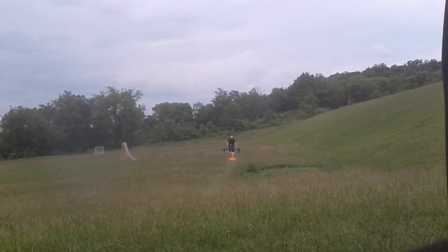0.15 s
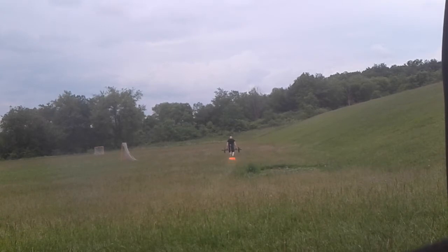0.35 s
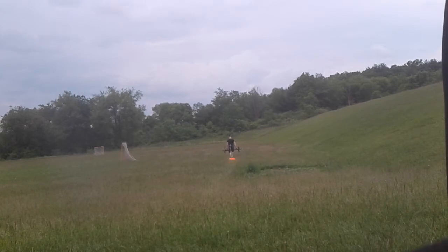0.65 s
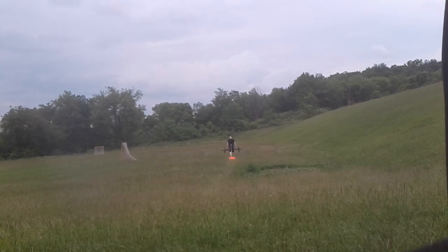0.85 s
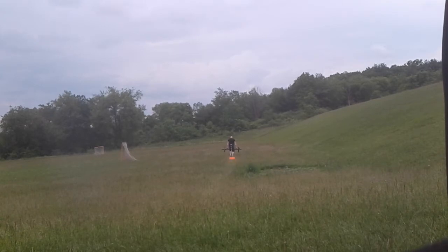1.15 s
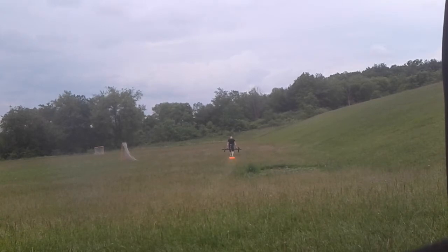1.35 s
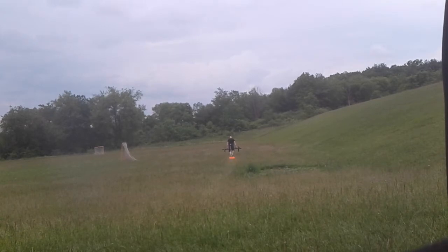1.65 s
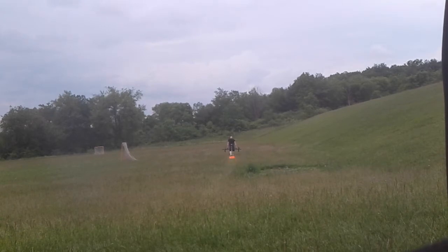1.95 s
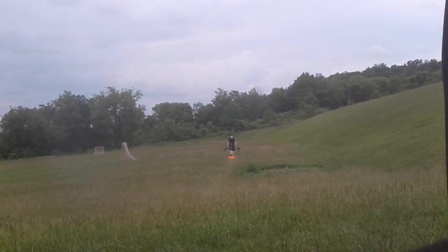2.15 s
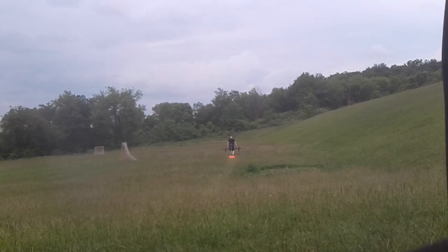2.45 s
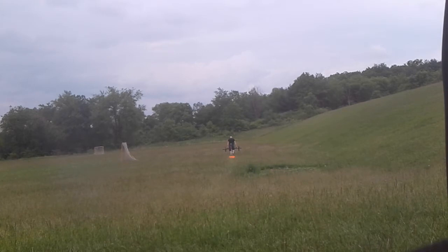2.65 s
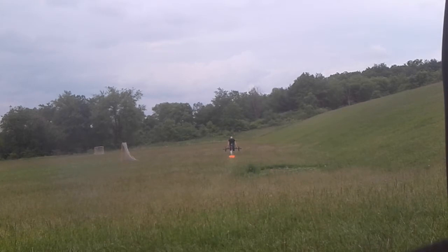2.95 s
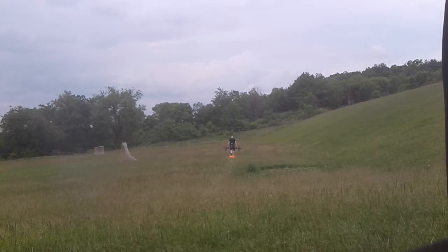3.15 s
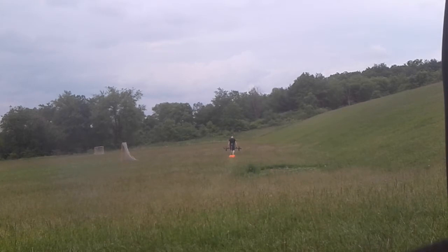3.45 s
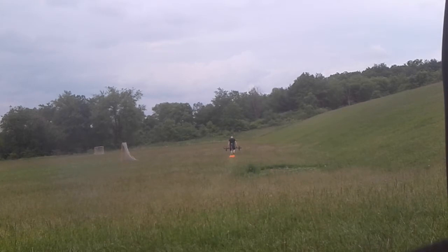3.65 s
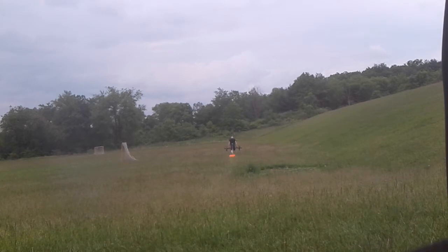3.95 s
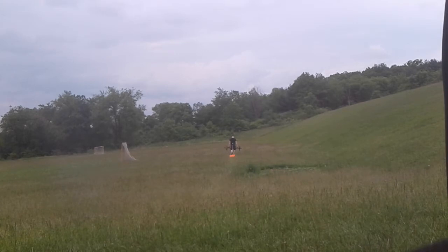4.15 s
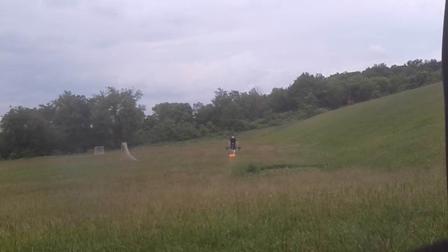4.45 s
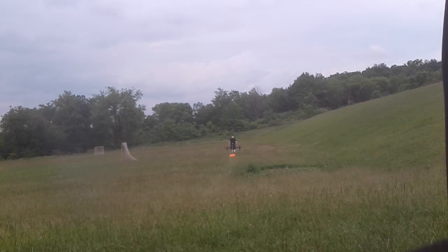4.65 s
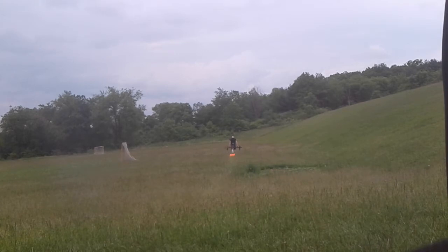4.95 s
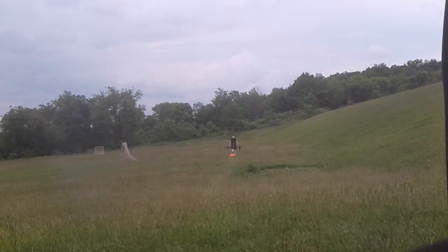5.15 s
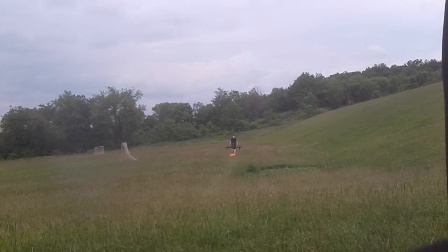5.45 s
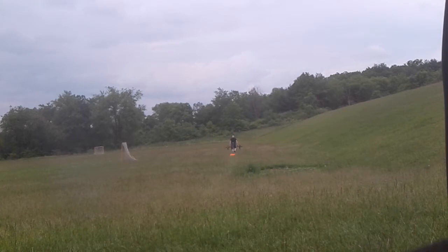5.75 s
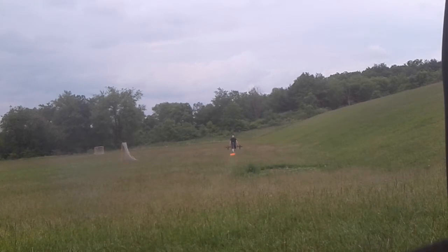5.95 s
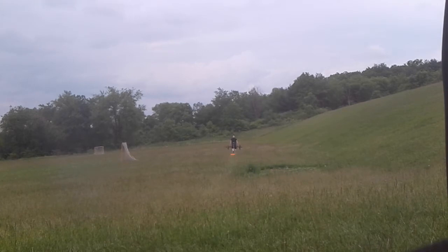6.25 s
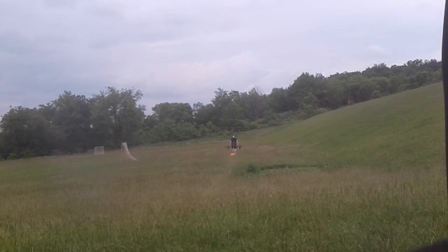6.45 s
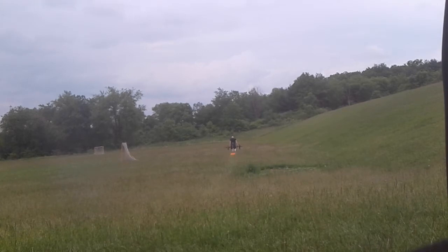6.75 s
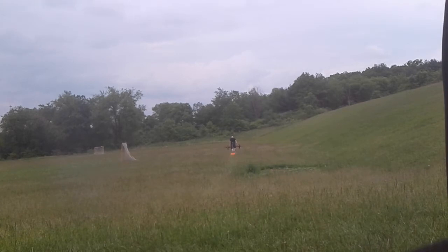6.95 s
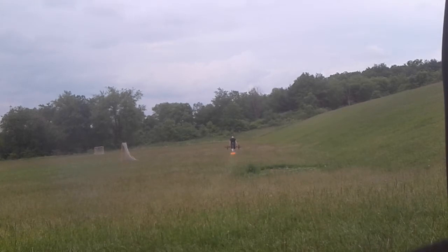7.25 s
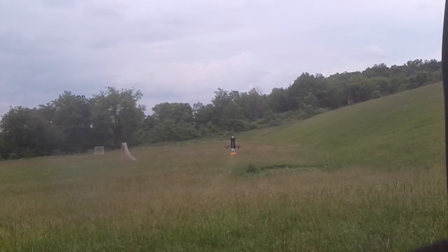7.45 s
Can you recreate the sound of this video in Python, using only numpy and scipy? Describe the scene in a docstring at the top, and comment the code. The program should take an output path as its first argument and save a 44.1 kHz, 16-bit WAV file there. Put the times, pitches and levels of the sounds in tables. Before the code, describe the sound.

Low wind gusts rumble and thump softly on the microphone in an open meadow while small birds chirp over faint distant traffic.

```python
"""A light wind in an open meadow, with birds along the tree line and traffic far off.
At first gusts rumble and knock on the two microphone ports while a bird warbles; clear peeps soon start
and quicken, then a thin trill joins high above. As the wind eases, with a few later knocks, whistles and
warbles carry on as gliding sines with a diffuse echo, and a few engine notes rise out of the drone.
Throughout lie the filtered noise of far traffic, its steady rush and low drone, and a thin hiss."""
import sys
import numpy as np
from scipy import signal
from scipy.fft import rfft, irfft
from scipy.io import wavfile

SR = 44100
rng = np.random.default_rng(int(sys.argv[2]) if len(sys.argv) > 2 else 0)


def to_wav(sig):
    """Store sig (one row per channel, or 1-D mono) as 16-bit WAV at the path in sys.argv[1].

    Samples outside -1..1 are clipped; the rate is SR.
    """
    pcm = np.clip(np.atleast_2d(sig), -1, 1) * 32767
    pcm = np.round(pcm).astype(np.int16)
    wavfile.write(sys.argv[1], SR, pcm.T)  # frames by channels


N = 335160
T = np.arange(N) / SR
FREQS = np.maximum(np.arange(N // 2 + 1) * SR / N, 1)
LEFT_RIGHT = np.array([[1], [-1]])  # sign of the left and the right port


def undb(db):
    """Decibels to gain."""
    return 10 ** (np.asarray(db) / 20)


def noise(gain):
    """Noise of rms 1 with the given gain at each frequency."""
    x = irfft(rfft(rng.standard_normal(N)) * gain, N)
    return x / np.std(x)


def colour(points):
    """Gain at each frequency from (pitch_hz, density_db) points; it falls away beyond the ends."""
    hz, db = np.transpose(points)
    gain = undb(np.interp(np.log(FREQS), np.log(hz), db))
    low_slope = np.minimum(FREQS / hz[0], 1) ** 2
    high_slope = np.minimum(hz[-1] / FREQS, 1) ** 2
    return gain * low_slope * high_slope


def walk(rate_hz):
    """Slow chance of spread 1 that changes about rate_hz times a second."""
    return noise(np.exp(-(FREQS / max(rate_hz, 1)) ** 2))


# rumble colour, relative: pitch_hz [Hz], density_db [dB per Hz]
RUMBLE_COLOUR = [(20, -38), (35, -18), (55, -5.5), (85, 2.5), (130, -3.5), (200, -11), (330, -20.5),
                 (600, -36.5), (1500, -77)]
# breeze between gusts, before the breeze trim: time_s [s], level_db [dB]
BREEZE_LEVEL = [(0.0, -45), (0.17, -50), (0.36, -50), (0.51, -47.5), (0.97, -50.5), (3.22, -53),
                (3.85, -47.5), (4.38, -56.5), (5.31, -58.5), (7.6, -54)]
# gusts that brush the ports, before shaping: peak_s [s], reach_s [s from peak to 1/e squared],
# level_db [dB at the windward port], pan_db [dB, left minus right]
GUST_SWELLS = [(.01, .06, -41, 5), (0.133, 0.049, -37, -9), (0.397, 0.12, -35.5, 10),
               (0.554, 0.18, -34, -14), (0.685, 0.13, -36, -20), (0.997, 0.046, -42, 3),
               (1.225, 0.041, -39, 2), (1.29, .09, -41.5, -13), (1.584, 0.061, -46, 7),
               (1.717, 0.042, -40, 10), (1.902, 0.29, -47.5, -10), (2.05, 0.036, -45, -4),
               (2.594, 0.044, -44.5, -3), (2.727, 0.048, -43, 9), (2.81, 0.033, -44, -8),
               (3.12, .05, -41.5, 16), (3.48, 0.41, -44.5, 10), (3.653, 0.091, -42, 8),
               (3.903, 0.15, -43.5, -14), (4.12, 0.042, -43, 9), (4.43, 0.046, -52, 0),
               (6.386, 0.068, -47, 1), (6.52, .04, -45, -8), (6.758, 0.18, -49, 2), (6.92, 0.058, -45, -2),
               (7.554, 0.057, -46, 6)]


def wind(calm_db=-53, ceiling_db=-37, breeze_trim_db=1.0, rumble_trim_db=-0.05,
         flutter_db=0.73, flutter_rate_hz=14):
    """Turbulence at each port: separate low rumbles follow a breeze and gusts that swell and die."""
    power = undb(breeze_trim_db + np.interp(T, *np.transpose(BREEZE_LEVEL))) ** 2
    for peak_s, reach_s, level_db, pan_db in GUST_SWELLS:
        swell = np.exp(-2 * ((T - peak_s) / reach_s) ** 2)
        port_gain = undb(level_db + np.minimum(LEFT_RIGHT * pan_db, 0))
        power = power + (swell * port_gain) ** 2
    # well below calm_db the rumble drops twice as fast in dB
    pressure = power / np.sqrt(power + undb(calm_db) ** 2)
    # the strongest gusts level off towards the ceiling
    pressure = pressure / np.hypot(1, pressure / undb(ceiling_db))
    ports = [noise(colour(RUMBLE_COLOUR)) * undb(flutter_db * walk(flutter_rate_hz)) for _ in range(2)]
    return np.array(ports) * pressure * undb(rumble_trim_db)


# strong eddies that knock on a port: centre_s [s], half_length_ms [ms],
# level_db [dB before the knock trim], side [0 left to 1 right]
EDDY_KNOCKS = [(0.0122, 1.25, -29, 0.18), (.3871, 1.5, -15.5, 0.024), (0.4127, 2.6, -24, 0),
               (0.426, 1.32, -20, 0), (.437, 1.2, -29, 1), (0.454, 1.5, -29, 0.015), (0.5451, 2, -27, 0.82),
               (0.5554, 2.5, -25, 0.97), (0.734, 2.5, -24.5, 1), (0.9933, 2.7, -34, 0.15),
               (1.224, 1.75, -19, 0.23), (1.299, 2.4, -34, 0.88), (3.111, 1.74, -25, 0),
               (3.367, 1.3, -33, 0.054), (3.629, 1.4, -30, 0.41), (3.857, 1.3, -28.5, 0.89),
               (3.8816, 2.8, -31, 0.82), (6.93, 1.8, -28.5, .7)]


def knocks(skirt=0.34, trim_db=-3.6):
    """An eddy crossing a port sucks, then pushes: one soft cycle of pressure with a slower skirt."""
    out = np.zeros((2, N))
    for centre_s, half_length_ms, level_db, side in EDDY_KNOCKS:
        u = (T - centre_s) * 1000 / half_length_ms
        near = np.abs(u) < 10
        u = u[near]
        cycle = u * np.exp((1 - u ** 2) / 2)
        slow_cycle = u / 2 * np.exp((1 - (u / 2) ** 2) / 2)
        angle = np.clip(side, 0, 1) * np.pi / 2
        port_gains = [np.cos(angle), np.sin(angle)]
        out[:, near] += undb(level_db + trim_db) * np.outer(port_gains, cycle - skirt * slow_cycle)
    return out


def birds(song_trim_db=-0.77, quaver=0.0045, shimmer_db=2, port_lag_s=.00004):
    """Each note is a pure whistle that glides, bends and quavers; the left port leads by port_lag_s."""
    out = np.zeros((2, N))
    pitch_wobble = 1 + quaver * walk(110)
    shimmer = undb(shimmer_db * walk(70))
    notes = warble() + whistlers() + peeps() + trill() + far_birds()
    for start_s, length_s, middle_hz, glide_hz, arch_hz, level_db, pan_db in notes:
        span = slice(max(int(start_s * SR), 0), min(int((start_s + length_s) * SR), N))
        u = np.linspace(0, 1, span.stop - span.start)
        # a positive arch lowers both ends, a negative one raises them
        hz = middle_hz + glide_hz * (u - .5) - arch_hz * (2 * u - 1) ** 2
        hz = hz * pitch_wobble[span]
        phase = 2 * np.pi * (np.cumsum(hz) / SR + LEFT_RIGHT * hz * port_lag_s / 2)
        swell = np.abs(np.sin(np.pi * u)) ** 0.44 * shimmer[span]
        out[:, span] += np.sin(phase) * swell * undb(song_trim_db + level_db + LEFT_RIGHT * pan_db / 2)
    return out


# Every bird function returns notes as: start_s, length_s, middle_hz, glide_hz, arch_hz,
# level_db (before song trim and shimmer), pan_db (left minus right).

# quick flicks: start_s [s], length_s [s], glide_hz [Hz], level_db [dB before song trim]
WARBLE_FLICKS = [(.775, 0.028, 300, -59), (1.406, .035, 600, -63), (1.444, 0.03, -600, -60.5),
                 (1.584, 0.019, -300, -60), (1.922, .028, -400, -63), (2.529, .016, 250, -64),
                 (2.544, .015, -300, -57.5), (2.584, 0.017, -400, -57.5), (2.593, .014, 400, -60),
                 (2.671, 0.0081, -400, -55), (3.204, 0.0087, -500, -59), (3.859, .023, 420, -62),
                 (3.887, .018, -400, -63), (3.942, 0.024, -500, -59.5), (4.085, 0.0195, -520, -58),
                 (4.521, .012, -400, -58.5), (5.052, .016, 250, -58), (5.636, 0.017, -480, -56.5),
                 (5.655, .014, -410, -57), (5.754, .014, -450, -57), (6.252, 0.018, 350, -57),
                 (6.29, .014, -350, -64), (7.156, .012, -300, -62.5)]
# longer slurs: start_s [s], length_s [s], middle_hz [Hz], level_db [dB before song trim]
WARBLE_SLURS = [(0.149, 0.05, 2560, -65), (0.799, 0.027, 2630, -57), (1.216, 0.0516, 2616, -54.5),
                (2.109, .051, 2530, -62.5), (2.475, 0.037, 2630, -62.5), (2.682, 0.025, 2620, -56),
                (2.766, 0.033, 2650, -56.5), (2.798, 0.043, 2560, -63), (3.147, 0.05, 2626, -52.5),
                (4.14, .055, 2544, -52.5), (5.055, .036, 2530, -52.5), (5.194, 0.058, 2520, -67),
                (5.77, .033, 2590, -64), (6.263, .028, 2580, -58), (6.716, 0.056, 2570, -54.5)]


def warble(flick_hz=2600, flick_arch_hz=25, slur_glide_hz=-230, slur_arch_hz=-35, pan_db=-2.5):
    """A bird mixes quick flicks, all through one pitch, with longer slurs that fall and level out."""
    flicks = [(start_s, length_s, flick_hz, glide_hz, flick_arch_hz, level_db, pan_db)
              for start_s, length_s, glide_hz, level_db in WARBLE_FLICKS]
    slurs = [(start_s, length_s, middle_hz, slur_glide_hz, slur_arch_hz, level_db, pan_db)
             for start_s, length_s, middle_hz, level_db in WARBLE_SLURS]
    return flicks + slurs


# long held notes: start_s [s], length_s [s], middle_hz [Hz], level_db [dB before song trim]
HELD_NOTES = [(.1, .06, 2835, -71), (.231, 0.089, 2790, -64.5), (2.07, 0.063, 2820, -67),
              (2.193, 0.077, 2780, -59.5), (3.24, .052, 2775, -70), (4.997, 0.066, 2850, -70),
              (5.115, 0.13, 2816, -71.5), (5.701, .067, 2750, -69)]
# soft whistles: start_s [s], length_s [s], middle_hz [Hz], glide_hz [Hz], level_db [dB before song trim]
GLIDING_WHISTLES = [(.374, .069, 2420, -110, -66), (1.657, 0.058, 2280, 120, -66),
                    (2.055, .035, 2170, 320, -63), (2.08, 0.037, 2200, -320, -56),
                    (2.283, .12, 2397, -100, -67), (2.415, .035, 3580, 250, -69),
                    (2.522, 0.041, 1208, -40, -57), (2.735, .035, 4060, -400, -74),
                    (2.845, 0.094, 2180, -360, -65), (3.28, 0.053, 2340, 20, -63),
                    (3.325, 0.035, 2220, -230, -62), (3.538, 0.039, 1203, -20, -51),
                    (4.595, 0.05, 2280, 200, -59), (4.677, .04, 2080, -100, -61.5),
                    (5.248, .089, 2385, -100, -64), (5.57, .018, 3560, -100, -63),
                    (5.586, .018, 3480, -500, -65), (6.309, 0.071, 2320, -180, -65),
                    (7.211, .083, 2270, 80, -69)]
WHISTLE_ARCH_HZ = 25


def whistlers(held_glide_hz=-54, held_pan_db=-12.5):
    """One bird holds notes that barely sag, panned by held_pan_db; others glide at equal level in both ports."""
    held = [(start_s, length_s, middle_hz, held_glide_hz, 0, level_db, held_pan_db)
            for start_s, length_s, middle_hz, level_db in HELD_NOTES]
    whistles = [(start_s, length_s, middle_hz, glide_hz, WHISTLE_ARCH_HZ, level_db, 0)
                for start_s, length_s, middle_hz, glide_hz, level_db in GLIDING_WHISTLES]
    return held + whistles


def peeps(count=9, start_s=.665, slow_gap_s=.326, fast_gap_s=.15, quicken_note=2.85, quicken_notes=.35,
          first_hz=4185, last_hz=3816, settle_notes=2.5, arch_hz=-20,
          base_db=-65, loudest_note=3.4, fade_db=.22, shy_db=-7.5, shy_notes=2.1,
          min_length_s=0.023, gap_share=0.18):
    """Clear peeps speed up and shorten as their pitch sinks and settles; the song swells and fades."""
    k = np.arange(count)
    quickness = 1 + np.exp((k - quicken_note) / quicken_notes)
    gaps_s = fast_gap_s + (slow_gap_s - fast_gap_s) / quickness
    starts_s = start_s + np.cumsum(gaps_s) - gaps_s
    pitches_hz = last_hz + (first_hz - last_hz) * np.exp(-k / settle_notes)
    levels_db = base_db - fade_db * (k - loudest_note) ** 2
    levels_db = levels_db + shy_db / (1 + (k / shy_notes) ** 6)  # a softer opening
    return [(s, min_length_s + gap_share * gap_s, hz, 0, arch_hz, db, 0)
            for s, gap_s, hz, db in zip(starts_s, gaps_s, pitches_hz, levels_db)]


def trill(count=5, start_s=1.785, gap_s=.151, length_s=.045, first_hz=6015, sag_hz_per_s=160,
          level_db=-79.5, pan_db=-2):
    """Evenly spaced thin, high notes, each a little lower than the last."""
    return [(start_s + t, length_s, first_hz - sag_hz_per_s * t, 0, 0, level_db, pan_db)
            for t in gap_s * np.arange(count)]


def far_birds(count=22, centre_hz=2600, spread_octaves=.22, glide_hz=300, length_s=.045,
              level_db=-72, spread_db=2, pan_db=4):
    """Birds deeper in the wood chirp faintly, with random times, lengths, pitches, glides and places."""
    starts_s = rng.uniform(0, T[-1] - .2, count)
    chance = rng.standard_normal((count, 5))
    return [(start_s, length_s * 2 ** (a / 2), centre_hz * 2 ** (spread_octaves * b), glide_hz * c,
             WHISTLE_ARCH_HZ, level_db + spread_db * d, pan_db * e)
            for start_s, (a, b, c, d, e) in zip(starts_s, chance)]


def tree_line(song, echo_db=-6, t60_s=0.31, build_s=0.0054):
    """Trunks and leaves scatter the song into a short diffuse tail that blurs the notes together."""
    t = T[:SR]
    decay = undb(-60 * t / t60_s)
    scatter = rng.standard_normal((2, SR)) * decay * (1 - np.exp(-t / build_s))
    scatter /= np.sqrt(np.sum(scatter ** 2, axis=1, keepdims=True))
    tail = signal.fftconvolve(song.mean(axis=0)[None], scatter, axes=1)[:, :N]
    return song + undb(echo_db) * tail


# single far engines: start_s [s], end_s [s], start_hz [Hz], end_hz [Hz], level_db [peak dB before waver]
ENGINE_NOTES = [(2.049, 3.001, 176.5, 196.8, -54), (4.884, 6.49, 235, 235.9, -60.5),
                (5.39, 8.2, 76.83, 75.06, -55.5), (7.05, 7.8, 404.6, 399, -67)]


def engines(drift=0.00371, waver_db=1.0):
    """The firing note of a distant vehicle swells, wavers in the moving air and fades."""
    out = np.zeros(N)
    for start_s, end_s, start_hz, end_hz, level_db in ENGINE_NOTES:
        u = np.clip((T - start_s) / (end_s - start_s), 0, 1)
        hz = start_hz + (end_hz - start_hz) * np.sin(np.pi / 2 * u)
        hz = hz * (1 + drift * walk(3.33))
        swell = np.sqrt(np.abs(np.sin(np.pi * u))) * undb(level_db + waver_db * walk(7.1))
        out += swell * np.sin(2 * np.pi * np.cumsum(hz) / SR)
    return out


# rush colour common to both ports, relative: pitch_hz [Hz], density_db [dB per Hz]
RUSH_MID_COLOUR = [(30, -3.5), (60, 4.5), (130, 7.5), (260, 3.5), (350, -4.5), (750, -4), (1090, -3),
                   (1240, -11.5), (1900, -15.5), (2650, -18.5), (3050, -23), (5000, -32.5), (9000, -45)]
# rush colour differing between the ports, relative: pitch_hz [Hz], density_db [dB per Hz]
RUSH_SIDE_COLOUR = [(30, -10), (70, -11), (300, 1.5), (500, -0.5), (740, 0), (860, 4), (1200, 1.5),
                    (1800, 1.5), (1970, 3), (2160, -10.5), (2350, -5), (3100, -13), (5000, -21.5),
                    (9000, -44)]
# level of the rush, before mid and side trims: time_s [s], level_db [dB]
RUSH_LEVEL_CURVE = [(0, -59), (1.2, -59), (2.6, -58), (4.4, -58.5), (6, -58.5), (7.6, -58)]
# engine and tyre bands: pitch_hz [Hz], width_hz [Hz], level_db [dB rms before the drone trim]
DRONE_BANDS = [(78, 6.4, -59), (120.6, 11.4, -58), (151.5, 18, -63.5), (235.2, 11, -64.5),
               (264.3, 8, -70.5), (370.6, 14, -77.5), (522, 92, -67), (665.7, 10, -71), (788, 42, -68),
               (913.4, 68, -66.5), (1022, 65, -66.5), (1556, 146, -72)]


def far_traffic(mid_trim_db=5.5, side_trim_db=-2, drone_trim_db=-2.0, drone_side=0.12, waver_db=0.68,
                pan_db=-0.8, approach_db=2):
    """A broad rush from all round the horizon, with engine and tyre bands that waver and slowly draw nearer."""
    level_db = np.interp(T, *np.transpose(RUSH_LEVEL_CURVE))
    mid = noise(colour(RUSH_MID_COLOUR)) * undb(mid_trim_db + 0.93 * walk(5.2))
    side = noise(colour(RUSH_SIDE_COLOUR)) * undb(side_trim_db + 0.48 * walk(6))
    rush = (mid + LEFT_RIGHT * side) * undb(level_db)

    band_power, drone_power = 0, 0
    for hz, width_hz, band_db in DRONE_BANDS:
        resonance = (1 + (2 * (FREQS - hz) / width_hz) ** 2) ** 2
        band_power = band_power + undb(band_db) ** 2 / width_hz / resonance
        drone_power += undb(band_db) ** 2
    bands = np.sqrt(band_power)
    drone = (noise(bands) + drone_side * LEFT_RIGHT * noise(bands)) * np.sqrt(drone_power)
    approach = approach_db * (T / T[-1] - .5)  # total rise in dB, centred on the middle
    drone *= undb(drone_trim_db + waver_db * walk(3.3) + approach)
    return (rush + drone) * undb(LEFT_RIGHT * pan_db / 2)


def scene():
    """Wind at the ports over the birds and the far traffic."""
    return wind() + knocks() + tree_line(birds()) + engines() + far_traffic()


# microphone hiss colour, relative: pitch_hz [Hz], density_db [dB per Hz]
HISS_COLOUR = [(1000, -13), (5000, -5.5), (8500, -4), (10500, 0.5), (13000, 1.5), (16000, 0.5)]


def record(dry, hiss_db=-71.0, low_cut_hz=24, top_hz=15750):
    """Each microphone thins the deepest bass and adds its own hiss; the top is cut steeply."""
    dry = irfft(rfft(dry) / (1 + (low_cut_hz / FREQS) ** 4), N)
    hiss = np.array([noise(colour(HISS_COLOUR)) for _ in range(2)]) * undb(hiss_db)
    top_cut = signal.ellip(12, .1, 70, top_hz, fs=SR, output="sos")
    return signal.sosfilt(top_cut, dry + hiss)


dry = scene()
out = record(dry)
to_wav(out)
```